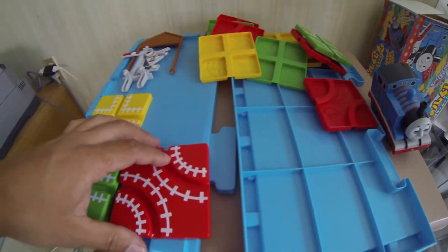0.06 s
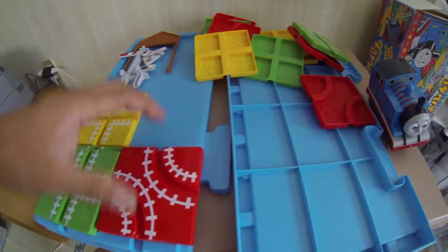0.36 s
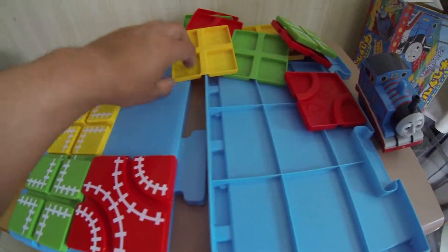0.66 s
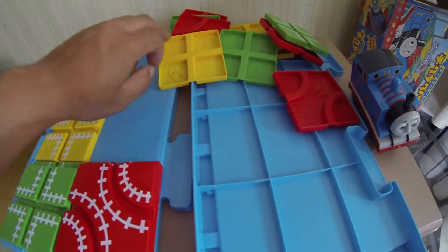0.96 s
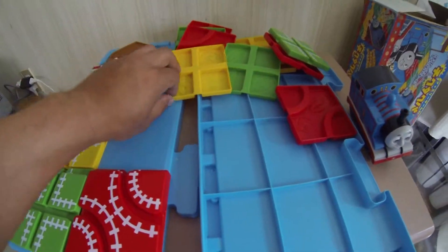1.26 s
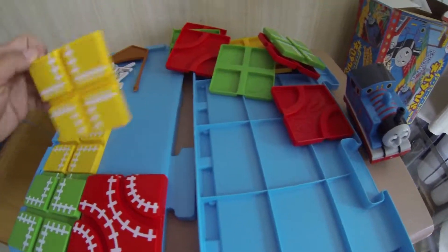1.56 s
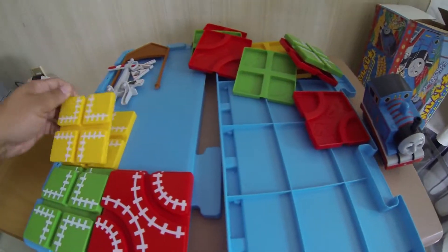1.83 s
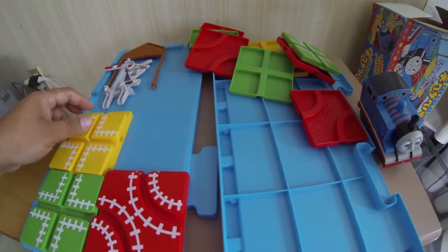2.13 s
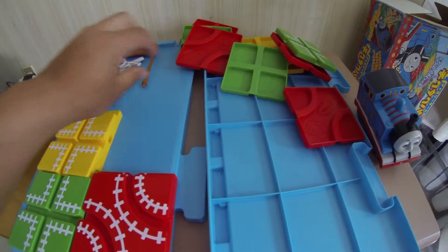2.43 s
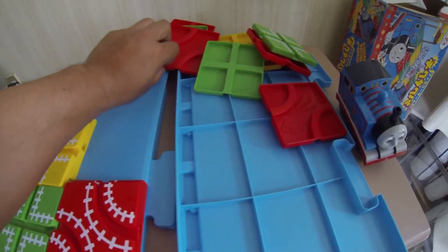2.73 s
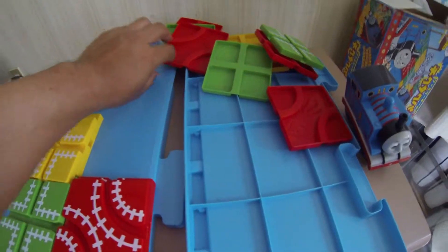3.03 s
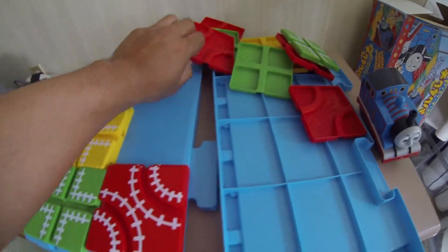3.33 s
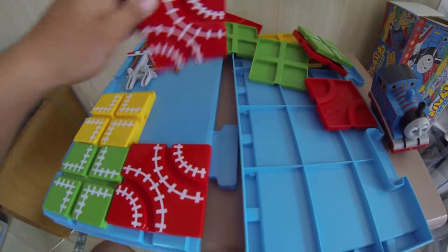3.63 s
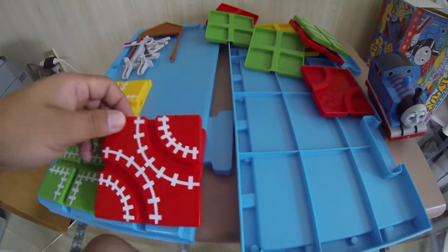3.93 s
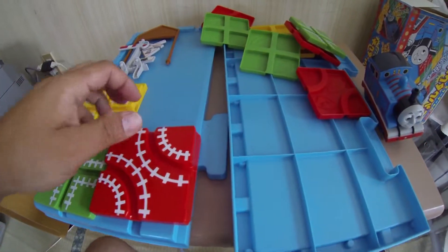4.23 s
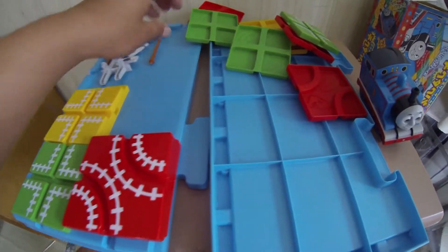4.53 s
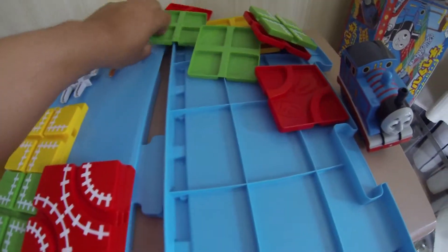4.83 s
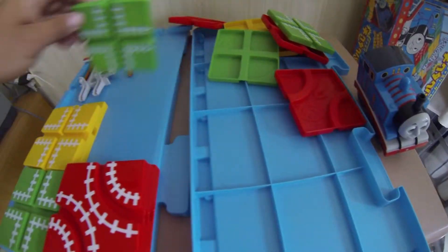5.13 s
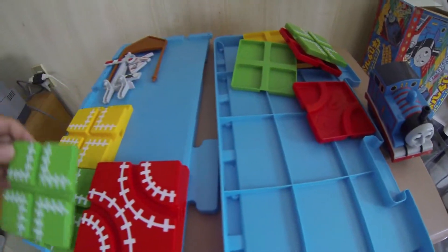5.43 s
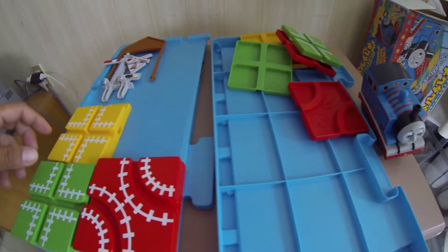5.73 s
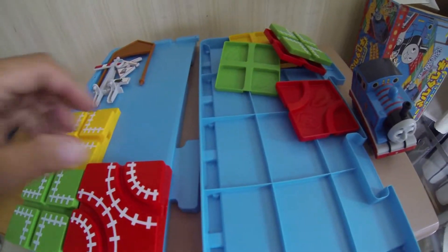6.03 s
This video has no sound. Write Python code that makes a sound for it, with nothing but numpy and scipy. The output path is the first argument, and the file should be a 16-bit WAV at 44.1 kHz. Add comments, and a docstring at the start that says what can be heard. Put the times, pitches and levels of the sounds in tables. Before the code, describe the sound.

Hollow plastic tiles rattle out of a loose pile and clack sharply into place on a plastic tray in a small room.

```python
"""In a small room, hollow plastic track tiles are pulled from a loose pile at the far end of a plastic
tray and set down close by. The pile rattles, scrapes and squeaks once; each tile then clacks into place
in a few sharp knocks, the loudest of which overload the microphone. Each knock makes the tile ring, its
edge crack and the tray thud. The last tile makes the tray thump on the table.
A low hum and faint hiss lie underneath."""
import sys
import numpy as np
from scipy import signal
from scipy.fft import rfft, irfft
from scipy.io import wavfile
from scipy.ndimage import uniform_filter1d

SR = 44100
rng = np.random.default_rng(int(sys.argv[2]) if len(sys.argv) > 2 else 0)


def int16_out(signal):
    """Quantize to a 16-bit WAV file."""
    q = np.round(np.clip(np.atleast_2d(signal).T, -1, 1) * 32767)
    wavfile.write(sys.argv[1], SR, q.astype(np.int16))


N = 272538
LENGTH = SR // 2   # samples in one short sound
AGE, TIME = np.arange(LENGTH) / SR, np.arange(N) / SR   # seconds into a short sound, and into the scene

# The tones a ribbed tile rings with: f/Hz, relative level/dB, base t60/s (t60 = time to fade by 60 dB)
TILE_TONES = [(820, -8.5, 0.022), (901, 0, 0.023), (1032, 3, 0.021), (1135, -3.5, 0.032),
              (1241, -1.5, 0.034), (1431, 0, 0.028), (1594, -0.5, 0.026), (1755, -6.5, 0.058),
              (1924, 0, 0.031), (2067, 2, 0.026), (2334, 4.5, 0.012), (2746, -13, 0.093)]
# The tones of the tray under the pile: f/Hz, relative level/dB, base t60/s
FAR_TRAY_TONES = [(381, -28, 0.14), (536, -24, 0.081), (701.5, -6, 0.061), (812, -4.5, 0.045)]


def near_tiles():
    """Tiles are set down close by: fingers damp their ring, and most of the sound arrives directly."""
    # Knocks: t/s, relative level/dB, ring centre f/Hz, relative crack level/dB, relative thud level/dB
    hits = [(0.014, -12, 1650, -15.5, -17), (0.216, -29, 1250, -39, -11), (0.255, -37.5, 1210, -35, -28),
            (1.672, 1.5, 1080, -9, -12), (1.957, -22, 1640, -20, -38), (1.968, -17.5, 1550, -11, -38),
            (1.977, -1.5, 1360, -18.5, -28), (1.988, -2.5, 1380, -10, -34), (2.051, -1.5, 1410, -12, -34),
            (3.834, 2, 1940, -13, -21.5), (3.87, -9.5, 1850, -11, -20), (3.964, 2, 2010, -14.5, -24),
            (4.071, 0.5, 1130, -6.5, -11.5), (4.18, -29, 2030, -29, -23), (5.448, 0, 2120, -13.5, -34),
            (5.525, -2, 1530, -11.5, -50), (5.6, -9.5, 1390, -12.5, -20), (5.636, 0.5, 1320, -6.5, -24)]
    return knocks(hits, TILE_TONES, level_db=18, crack_db=-0.5, thud_db=-3.5, snap_db=1.0,
                  sustain=0.71, spill=0.53, crack_t60=0.018, thud_t60=0.011, contact_s=0.0013,
                  early_db=-8.0, tail_db=-8.0, shudder_db=-7, flat_hz=1530,
                  bounce_s=0.019, rebound_db=-4.5, rattle_top_db=-15.5, rattle_crack_db=-16)


def far_pile():
    """Loose tiles knock together at the far end: they ring longer, and more of the sound is echo."""
    # Knocks: t/s, relative level/dB, ring centre f/Hz, relative crack level/dB, relative thud level/dB
    hits = [(0.618, -6, 870, -16, -12.5), (0.627, -1.5, 1360, -17.5, -22), (0.685, -15, 1320, -14, -14),
            (0.717, -6.5, 940, -11.5, -18), (0.803, -2.5, 1450, -10.5, -46), (0.812, -1.5, 1220, -32, -34),
            (0.831, -2.5, 1350, -11, -22.5), (1.103, -10, 840, -22, -12.5), (1.112, -8, 1900, -17.5, -39),
            (1.125, -3, 1200, -10, -29), (1.307, -2.5, 1540, -9, -46), (1.363, -12.5, 1520, -14, -40),
            (2.572, -20, 1140, -12, -8.5), (2.749, -18, 1390, -12, -8.5), (2.999, -22.5, 1430, -18.5, -8),
            (3.064, -20, 1310, -21.5, -33), (3.101, -12, 1230, -19, -42), (3.127, -8, 1200, -14, -22),
            (3.138, -4.5, 1360, -22, -22), (3.217, -6, 960, -17, -20), (3.247, -7.5, 1170, -21, -26),
            (3.274, -8.5, 1230, -23, -38), (3.332, -13, 1230, -30, -35), (3.356, -7, 1040, -18, -20),
            (3.365, -9.5, 1490, -14.5, -16.5), (3.506, -35, 1930, -8, 0.5), (4.719, -10.5, 1040, -22, -12),
            (4.75, -4.5, 1040, -14.5, -38), (4.806, -1.5, 1730, -19, -37), (4.861, 1.5, 1390, -14, -28.5),
            (4.895, -6.5, 900, -35, -26), (5.001, 2, 850, -11, -34), (5.027, -6.5, 1050, -22, -20),
            (5.054, -2.5, 1120, -18, -18.5), (5.181, -12, 1030, -20, -20), (5.228, -6, 950, -26, -20),
            (5.318, -20.5, 950, -28, -10.5), (6.102, -12, 1300, -28.5, -13)]
    return knocks(hits, TILE_TONES + FAR_TRAY_TONES, level_db=13.0, crack_db=5, thud_db=1.5, snap_db=-1.0,
                  sustain=1.23, spill=0.36, crack_t60=0.021, thud_t60=0.037, contact_s=0.0012,
                  early_db=-0.5, tail_db=-12.5, shudder_db=5, flat_hz=1200,
                  bounce_s=0.013, rebound_db=-8.5, rattle_top_db=-4, rattle_crack_db=-21.5)


def knocks(hits, tones, level_db, crack_db, thud_db, snap_db, sustain, spill, crack_t60, thud_t60,
           contact_s, early_db, tail_db, shudder_db, flat_hz, bounce_s, rebound_db, rattle_top_db,
           rattle_crack_db):
    """Each knock rings the tile, cracks at its edge and pushes the tray; then the tile rattles to rest."""
    # The dull noise of the shaking tray: f/Hz, relative level/dB
    shudder_colour = [(40, -16), (100, 7.5), (160, -3.5), (230, -7), (380, -2.5), (520, -18.5), (900, -11),
                      (1500, -53.5)]
    out = np.zeros(N)
    onset = (1 - np.exp(-AGE / contact_s)) ** 2   # a corner touches first, then the whole edge

    def contact(db, centre_hz, edge_db, push_db):
        """One touch of plastic on plastic, with its echoes."""
        ring = unit(tile_ring(tones, centre_hz, sustain, spill) * onset)
        whole_tile = unit(tile_ring(tones, np.sqrt(centre_hz * flat_hz), sustain, spill=1.0) * onset)
        crack = from_db(edge_db + crack_db) * unit(edge_crack(db + edge_db, crack_t60) * onset)
        shudder = from_db(shudder_db) * unit(noise(shudder_colour, LENGTH) * dying(thud_t60) * onset)
        thud = from_db(push_db + thud_db) * unit(unit(tray_push()) + shudder)
        # the crack and the favoured tones head straight for the listener; the room hears the whole tile
        direct = ring + from_db(snap_db) * crack + thud
        echoes = room(whole_tile + crack + thud, early_db, tail_db)
        return from_db(db + level_db) * (direct + echoes)

    for start, db, centre_hz, edge_db, push_db in hits:
        add(out, start, contact(db, centre_hz, edge_db, push_db))
        # a tile falls back flat under its own weight, so even the hardest knock rattles only so loud
        rebound = contact(min(db + rebound_db, rattle_top_db), flat_hz, rattle_crack_db, push_db)
        add(out, start, signal.fftconvolve(bounces(bounce_s), rebound))
    return out


def tile_ring(tones, centre_hz, sustain, spill, octaves=0.35, scatter_db=3.0, detune=0.032, lag_s=0.00069):
    """Where a tile is struck favours the tones near one pitch; the grip shifts and damps them."""
    hz, db, t60 = np.transpose(tones)
    hz = hz * (1 + detune * rng.standard_normal(len(hz)))
    favour = spill + np.exp(-0.5 * (np.log2(hz / centre_hz) / octaves) ** 2)   # spill lets all tones in
    gain = favour * from_db(db + scatter_db * rng.standard_normal(len(hz))) * rng.choice([-1, 1], len(hz))
    # bending waves need a moment to cross the ribs, so the tones start one after another
    age = np.maximum(AGE[:LENGTH // 4] - lag_s * rng.random((len(hz), 1)), 0)
    fade = dying(sustain * t60[:, None], age)
    ring = gain @ (np.sin(2 * np.pi * hz[:, None] * age) * fade)
    return np.pad(ring, (0, LENGTH - len(ring)))


def edge_crack(db, t60, firm_db=-14, firm_hz=10000, db_per_octave=26):
    """A burst of the tile's many high tones; a harder contact is shorter and so brighter."""
    # The sharp noise of a struck edge: f/Hz, relative level/dB
    crack_colour = [(1700, -10), (2600, 5.5), (3300, 3.5), (4100, 5), (5200, 1.5), (6500, -6.5),
                    (8000, -13), (10500, -12), (13000, -23), (16000, -28)]
    cutoff_hz = np.clip(firm_hz * 2 ** ((db - firm_db) / db_per_octave), 4000, 17000)
    lowpass = signal.butter(2, cutoff_hz, fs=SR, output="sos")
    return signal.sosfilt(lowpass, noise(crack_colour, LENGTH)) * dying(t60)


def tray_push(low_hz=119.3, high_hz=636):
    """The tray gives under a blow: one short, dull pulse of air."""
    click = signal.unit_impulse(LENGTH) + 1e-18
    return signal.sosfilt(signal.butter(2, [low_hz, high_hz], "band", fs=SR, output="sos"), click)


def bounces(gap_s, shrink=0.8, loss_db=8, jitter=0.2, count=3):
    """The clicks of a tile coming to rest: each is weaker, and the uneven gaps tend to shrink."""
    bounce, clicks = np.arange(count), np.zeros(LENGTH)
    gaps = gap_s * shrink ** bounce * np.exp(jitter * rng.standard_normal(count))
    landings = np.minimum((np.cumsum(gaps) * SR).astype(int), LENGTH - 1)
    clicks[landings] = from_db(-loss_db * bounce) * rng.choice([-1, 1], count)
    return clicks


def scrapes(slips_per_s=95, spread_db=3.0, swell_s=0.0068, points=3):
    """A sliding tile rests on a few points; each catches and slips at random, ringing and ticking."""
    # Plastic sliding on plastic: start t/s, end t/s, level/dB, grit level/dB compared with the ring
    slides = [(0.047, 0.223, -54.5, -10), (0.749, 0.823, -30.5, -8.5), (1.132, 1.188, -28, -23),
              (1.259, 1.336, -31.5, -10.5), (1.491, 1.657, -53, 9), (1.921, 2.014, -41, -6),
              (2.671, 2.781, -42.5, -14), (3.221, 3.343, -25.5, -15.5), (3.358, 3.38, -33.5, -8.5),
              (4.759, 4.861, -22, -1), (4.871, 5.015, -24.5, -12.5), (5.016, 5.129, -22, -13.5)]
    out = np.zeros(N)
    for start, end, db, grit_db in slides:
        pressure = (AGE < end - start) * (1 - np.exp(-AGE / swell_s))
        stroke = np.zeros(LENGTH)
        for _ in range(points):
            sizes = from_db(spread_db * rng.uniform(-1, 1, LENGTH)) * rng.choice([-1, 1], LENGTH)
            slips = sizes * (rng.random(LENGTH) < slips_per_s / SR) * pressure
            ring = unit(tile_ring(TILE_TONES + FAR_TRAY_TONES, centre_hz=1250, sustain=1.6, spill=0.4))
            tick = from_db(grit_db) * unit(edge_crack(db + grit_db, t60=0.027))
            echoes = room(ring + tick, early_db=-8, tail_db=-4.5)
            stroke += signal.fftconvolve(slips, ring + tick + echoes)[:LENGTH]
        add(out, start, from_db(db) * unit(stroke) * np.sqrt((end - start) * SR))
    return out


def tray_thump(start_s=5.662, gain_db=-11):
    """The broad tray drops flat on the table: a dull knock, with its floor ringing on."""
    # The tones of the whole tray: f/Hz, relative level/dB, t60/s
    tray_tones = [(170.3, -12, 0.23), (290, -42, .025), (415, -1, 0.023), (564, 13.5, 0.011),
                  (910, -7, 0.26), (1051, -6, 0.29), (1420, -20, .03)]
    out = np.zeros(N)
    ring = sum(from_db(db) * np.sin(2 * np.pi * hz * AGE) * dying(t60) for hz, db, t60 in tray_tones)
    add(out, start_s, from_db(gain_db) * (ring + room(ring, early_db=-25.0, tail_db=-9)))
    return out


def squeak(start_s=4.757, attack_s=0.0071, hold_s=0.017, t60=0.12, level_db=-21.5):
    """A dragged edge sticks and slips quickly and regularly, giving one wavering whistle."""
    whistle = narrow_noise(hz=3587, width_hz=19)
    loudness = np.sqrt(np.abs(uniform_filter1d(whistle ** 2, size=100)) + 1e-20)
    age = TIME - start_s
    attack = np.clip(age / attack_s, 0, 1)
    release = dying(t60, np.maximum(age - hold_s, 0))
    return from_db(level_db) * whistle / loudness * attack * release


def room(sound, early_db, tail_db, early_t60=0.16, tail_t60=0.38, gap_s=0.0018,
         treble_hz=5100, treble_t60=0.34, treble_db=-3):
    """Quick echoes off tray, table and wall, then a longer tail whose treble is weaker and dies sooner."""
    echoes = diffuse(sound) * (1 - np.exp(-(AGE / gap_s) ** 2))
    dull = signal.sosfilt(signal.butter(1, treble_hz, fs=SR, output="sos"), echoes)
    treble = from_db(treble_db) * (echoes - dull)
    early = from_db(early_db) * unit(dying(early_t60))
    dull_fade = np.hypot(early, from_db(tail_db) * unit(dying(tail_t60)))
    treble_fade = np.hypot(early, from_db(tail_db) * unit(dying(treble_t60)))
    return np.linalg.norm(sound) * (dull * dull_fade + treble * treble_fade) / np.std(echoes)


def diffuse(sound):
    """Sound sent out all round comes back as noise that keeps its low tones and blurs the high ones."""
    running_power = np.concatenate([[0], np.cumsum(np.abs(rfft(sound)) ** 2)])
    bins = np.arange(len(running_power) - 1)
    blur_ratio = np.interp(bins * SR / LENGTH, [1500, 4000], [1.015, 1.1])
    low = (bins / blur_ratio).astype(int)
    high = np.minimum((bins * blur_ratio).astype(int) + 1, len(bins))
    blurred_power = (running_power[high] - running_power[low]) / (high - low)
    return irfft(np.sqrt(blurred_power) * rfft(rng.standard_normal(LENGTH)), LENGTH)


def background():
    """Steady room air, a wavering hum, a deep rumble and a faint high whine."""
    # The hiss of the room's air: f/Hz, relative level/dB
    air_colour = [(20, -11), (35, -3.5), (60, -10.5), (120, -16), (300, -24), (600, -27.5), (1150, -26.5),
                  (2000, -33.5), (3300, -42), (5000, -46.5), (7500, -55.5), (10000, -58), (13000, -58),
                  (15000, -96)]
    # How the hum swells and dips: t/s, level/dB
    hum_levels = [(0, -59), (2.0, -53), (4.05, -50.5), (4.25, -41), (5.0, -47.5), (6.18, -40.5)]
    # The thin bands of the whine: f/Hz, filter width/Hz, level/dB
    whine_bands = [(10400, 350, -84.5), (15050, 450, -97)]
    hum_gain = from_db(np.interp(TIME, *np.transpose(hum_levels)))
    hum = hum_gain * narrow_noise(hz=48.3, width_hz=9)
    whine = sum(from_db(db) * narrow_noise(hz, width_hz) for hz, width_hz, db in whine_bands)
    air = from_db(-45.5) * noise(air_colour, N)
    rumble = from_db(-53) * narrow_noise(hz=27, width_hz=14)
    return air + hum + rumble + whine


def narrow_noise(hz, width_hz):
    """Noise passed twice through a ringing filter, which leaves a wavering tone of average power 1."""
    r = np.exp(-np.pi * width_hz / SR)
    forward = np.array([1, 0, -1]) * (1 - r * r) / 2
    feedback = [1, -2 * r * np.cos(2 * np.pi * hz / SR), r * r]
    once = signal.lfilter(forward, feedback, rng.standard_normal(N))
    return rms_one(signal.lfilter(forward, feedback, once))


def noise(colour, size):
    """Noise of average power 1; its colour says how strong each frequency is."""
    hz, db = np.transpose(colour)
    grid_hz = np.maximum(np.fft.rfftfreq(size, 1 / SR), 1)
    gain = from_db(np.interp(np.log(grid_hz), np.log(hz), db))
    return rms_one(irfft(rfft(rng.standard_normal(size)) * gain, size))


def from_db(db):
    """Turn decibels into a number to multiply by."""
    return 10 ** (np.asarray(db) / 20)


def rms_one(x):
    """Scale to an average power of 1."""
    return x / np.sqrt(np.mean(x ** 2) + 1e-20)


def unit(x):
    """Scale to a total energy of 1."""
    return x / np.sqrt(np.sum(x ** 2) + 1e-20)


def dying(t60, age=AGE):
    """A fade that falls 60 dB in t60 seconds."""
    return np.exp(-np.log(1000) * age / t60)


def add(out, start_s, sound):
    """Mix a sound in at the given time."""
    at = max(round(start_s * SR), 0)
    out[at:at + len(sound)] += sound[:max(N - at, 0)]


def scene():
    """Tiles, tray and background, added into one channel."""
    return (near_tiles() + far_pile() + scrapes() + tray_thump() + squeak() + background())[None]


def record(dry):
    """The loudest knocks overload the microphone and are squashed; the highest treble is cut."""
    ceiling, cutoff_hz = 0.9, 16600
    squashed = dry / (1 + (dry / ceiling) ** 6) ** (1 / 6)
    return signal.sosfilt(signal.cheby2(16, 80, cutoff_hz, fs=SR, output="sos"), squashed)


dry = scene()
out = record(dry)
int16_out(out)
```